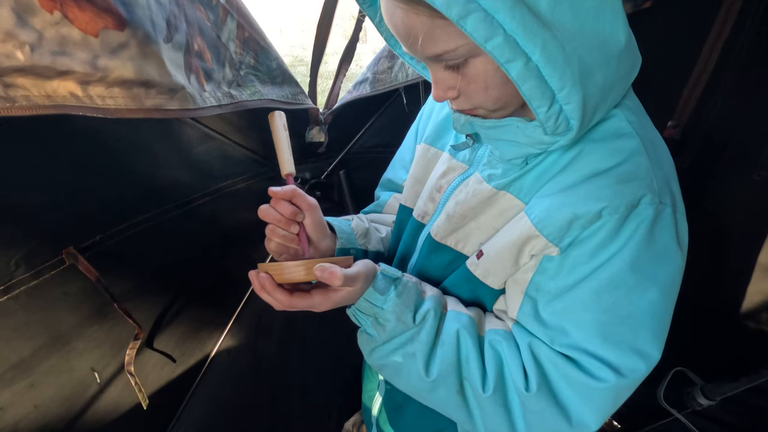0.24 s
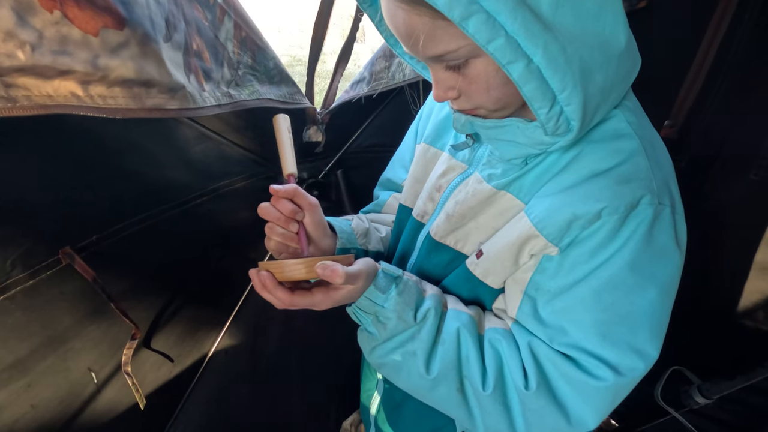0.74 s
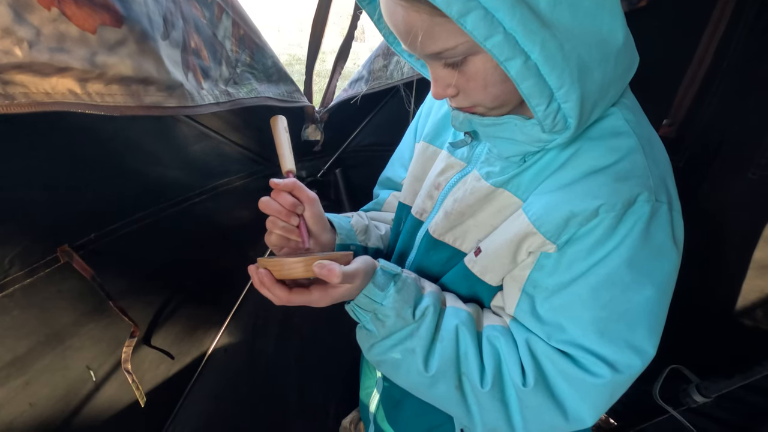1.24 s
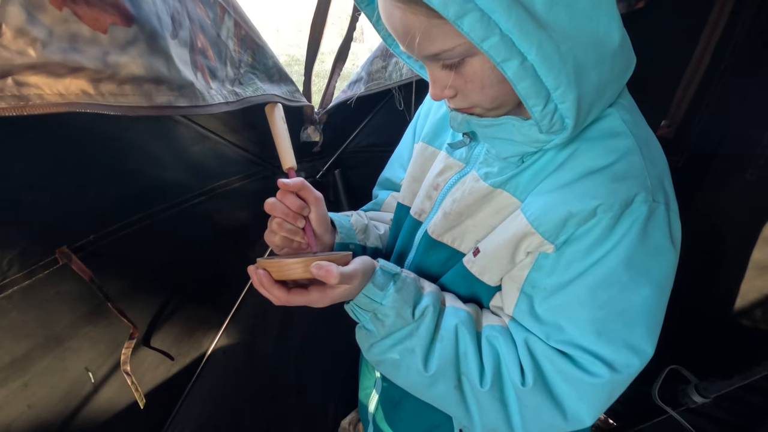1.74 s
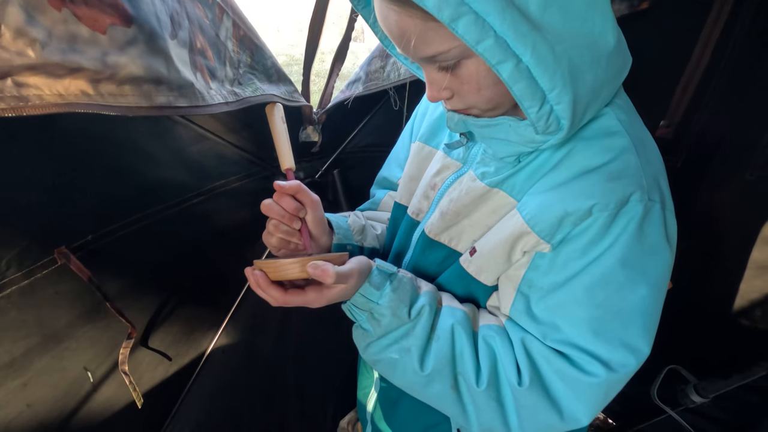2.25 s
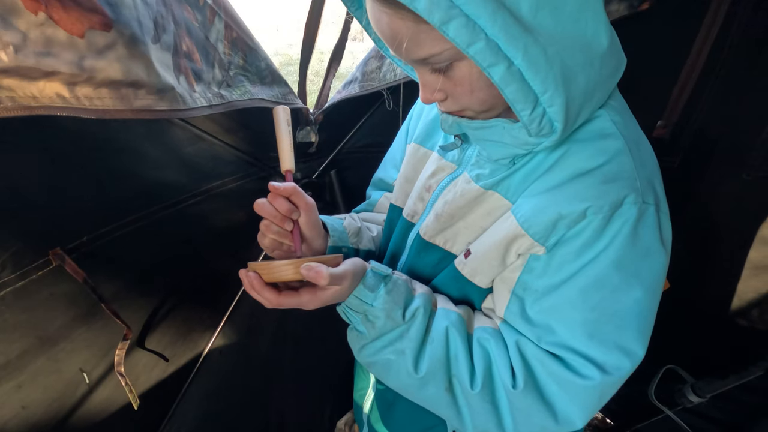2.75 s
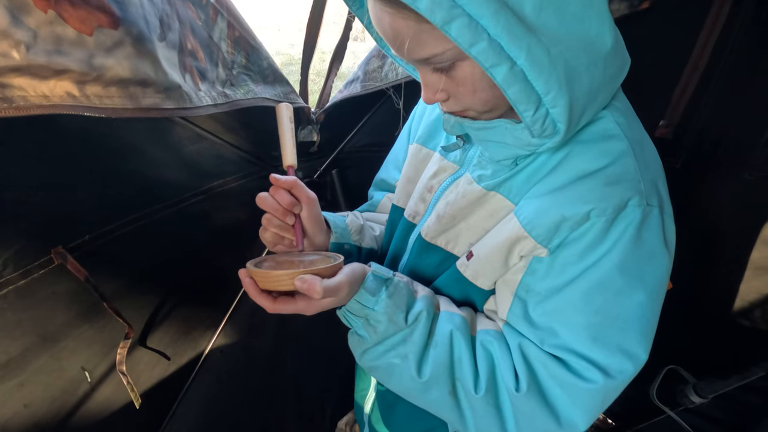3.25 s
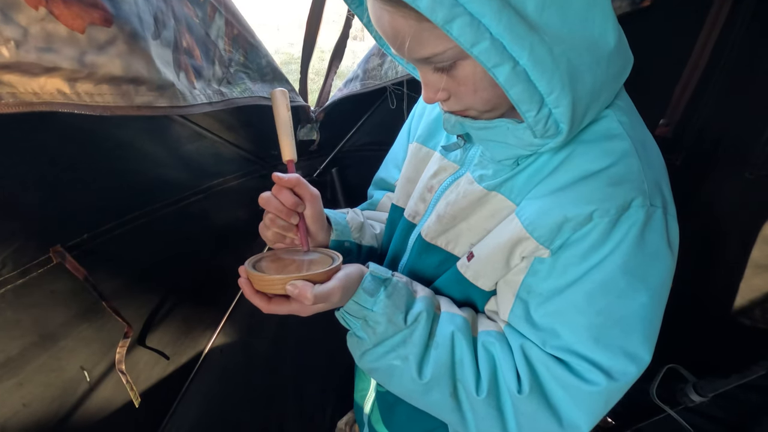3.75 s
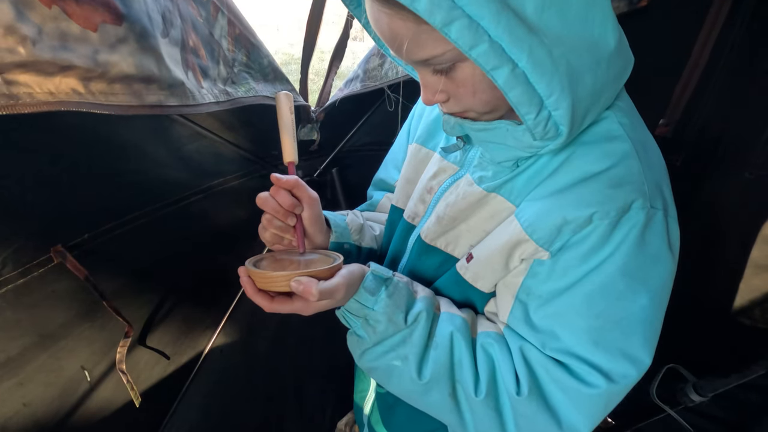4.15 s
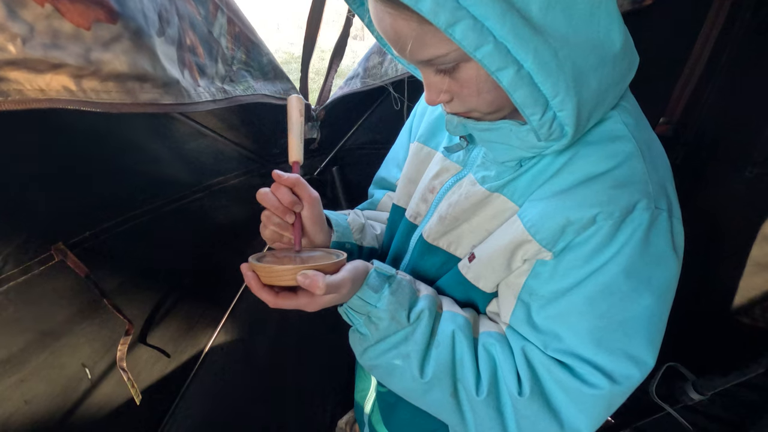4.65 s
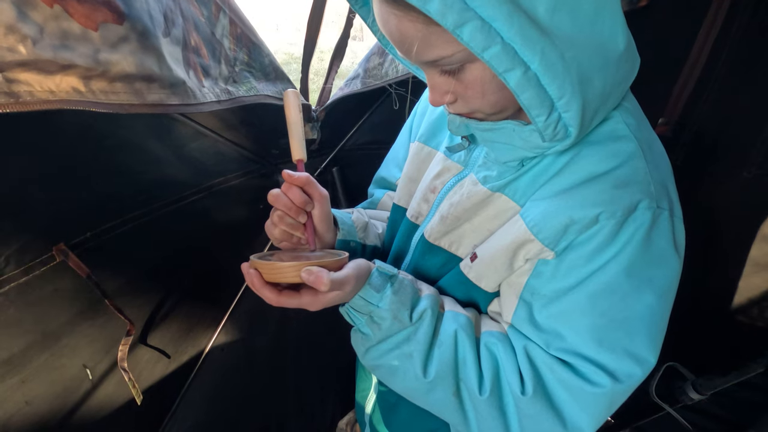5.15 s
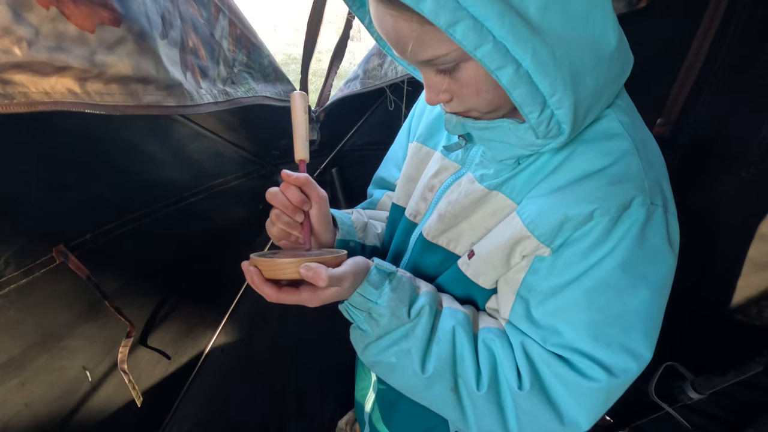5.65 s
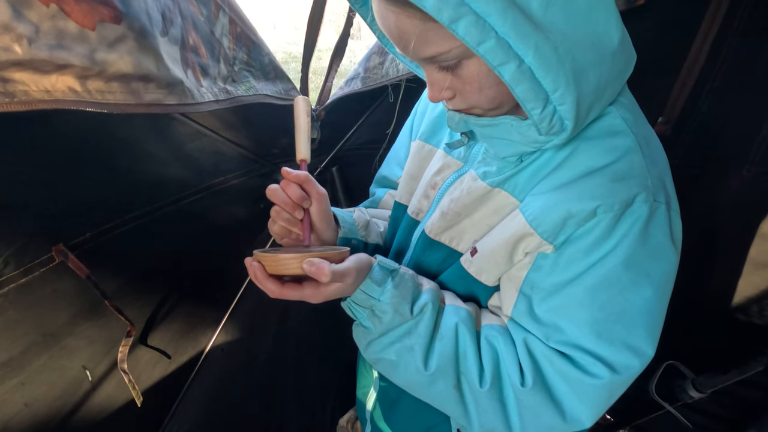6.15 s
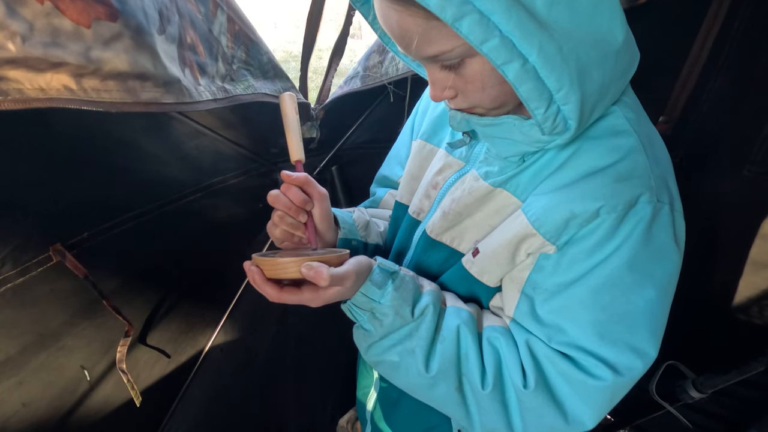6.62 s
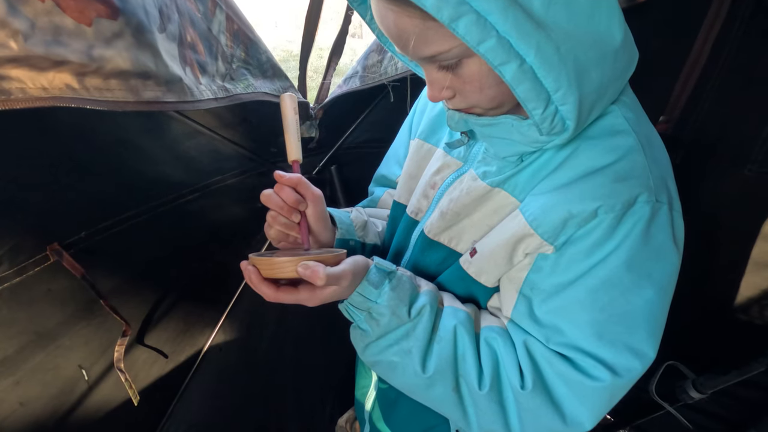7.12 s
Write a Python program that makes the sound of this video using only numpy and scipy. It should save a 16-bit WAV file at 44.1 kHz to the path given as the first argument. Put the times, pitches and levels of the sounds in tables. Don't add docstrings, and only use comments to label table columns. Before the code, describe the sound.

Close, dry, woody hen-turkey yelps, nasal whines and sharp clucks from a friction pot call inside a cloth blind, with quiet outdoor hush.

```python
import sys
import numpy as np
from scipy import signal
from scipy.fft import rfft, irfft
from scipy.io import wavfile
from scipy.ndimage import uniform_filter1d

SR = 44100
rng = np.random.default_rng(int(sys.argv[2]) if len(sys.argv) > 2 else 0)


def inscribe(sig):
    pcm = np.round(np.clip(np.atleast_2d(sig).T, -1, 1) * 32767)
    wavfile.write(sys.argv[1], SR, pcm.astype(np.int16))


def linear_from_db(decibels):
    return 10 ** (np.asarray(decibels, float) / 20)


N = 325458
FREE_HZ = 985


def read(points, hz):
    f, value = np.transpose(points)
    return np.interp(np.log(hz + 1), np.log(f + 1), value)


def amp_at(points, hz):
    return linear_from_db(read(points, hz))


def evened(x):
    return x / np.sqrt(np.mean(x ** 2) + 1e-20)


def band(x, lo_hz, hi_hz):
    return signal.lfilter(*signal.butter(2, [lo_hz, hi_hz], "band", fs=SR), x)


def wander(count, hz):
    drift = signal.lfilter(*signal.butter(3, hz, fs=SR), rng.standard_normal(16384))
    return evened(drift)[-count:]


def add(mix, s, sound):
    part = mix[round(s * SR):][:len(sound)]
    part += sound[:len(part)]


def level(rows):
    s, db = np.transpose(rows)[:2]
    return uniform_filter1d(linear_from_db(np.interp(np.arange(N) / SR, s, db, -200, -200)), size=900)


def echoes(x, t60):
    at = np.arange(150, 8000, 20) + rng.integers(0, 20, (2, 393))
    taps = np.zeros((2, 8100))
    np.put_along_axis(taps, at, rng.choice([-1., 1.], at.shape) * linear_from_db(-60 * at / SR / t60), 1)
    return signal.fftconvolve(x[None], taps / np.linalg.norm(taps[0]), axes=1)[:, :N]


def air():
    # f/Hz, level/dB per Hz
    hush = [(20, 0.5), (100, -12.5), (190, -8), (310, -23), (500, -24), (1100, -24), (1900, -27),
            (2600, -25.5), (3300, -34.5), (6000, -38.5), (8500, -41.5), (10500, -49.5), (14000, -55.5)]
    # f/Hz, likeness/0-1
    alike = [(60, 0.83), (180, 0.25), (530, 0.29), (1580, 0.12), (4700, 0.65), (14000, 0.27)]
    frames, hz = N // 512 + 5, np.fft.rfftfreq(2048, 1 / SR)
    a, b, c, d, patches = rng.standard_normal((frames, 1025, 5)).T
    patches = evened(uniform_filter1d(uniform_filter1d(patches, 14, 0), 12, 1))
    same = np.clip(read(alike, hz), -1, 1)[:, None]
    left = a + 1j * b
    right = same * left + np.sqrt(1 - same ** 2) * (c + 1j * d)
    z = np.array([left, right]) * linear_from_db(read(hush, hz)[:, None] + 1.2 * patches)
    sound = signal.istft(z, nperseg=2048, noverlap=1536)[1][:, :N]
    return linear_from_db(-68.5) * evened(sound)


def engine():
    # t/s, level/dB
    drone = [(0.0, -81.5), (0.59, -90), (1.54, -75), (1.95, -84), (2.55, -62.5), (3.82, -60.5), (4.34, -71),
             (4.81, -64), (5.57, -84), (5.73, -78), (7.38, -82.5)]
    return level(drone) * evened(band(rng.standard_normal(N), 73, 79))


def rumble():
    # t/s, level/dB
    swell = [(0.0, -72.5), (0.57, -74), (3.02, -60), (3.21, -69.5), (3.7, -64.5), (4.3, -66), (5.24, -73),
             (5.32, -70), (5.43, -66.5), (6.7, -74), (7.38, -71)]
    return linear_from_db(-6.5) * level(swell) * evened(band(rng.standard_normal(N), 17, 190))


def whistle(length, first_hz, last_hz, arch_hz, db, flutter, edge):
    u = np.linspace(0, 1, round(length * SR))
    hz = first_hz + (last_hz - first_hz) * u + arch_hz * np.sin(np.pi * u)
    rough = 1 + flutter * np.resize(wander(16384, hz=69.2), len(hz))
    tone = np.sin(2 * np.pi * np.cumsum(hz) / SR)
    return linear_from_db(db) * rough * tone * signal.windows.tukey(len(hz), edge)


def cooing():
    # start/s, end/s, f/Hz, level/dB
    coos = [
        (2.15, 2.679, 441, -71),
        (6.5, 6.903, 497, -76),
    ]
    out = np.zeros(N)
    for a, b, hz, db in coos:
        add(out, a, whistle(b - a, hz, hz, 0, db, flutter=.1, edge=0.33))
    return out


def bird():
    # t/s, length/s, first f/Hz, last f/Hz, arch/Hz, level/dB
    notes_sung = [(3.12, 0.17, 2880, 2315, 33, -65), (3.39, 0.14, 2850, 2400, 40, -69),
                  (5.265, 0.12, 3015, 2800, -94.5, -72.5), (5.35, 0.19, 2980, 2920, 0, -84),
                  (5.4, 0.33, 8430, 7550, -3, -80.5)] + [ (s - .008, .045, 2520, 2430, 190, db) for s, db in [(3.6394, -75.5),
                  (3.7549, -80), (3.8846, -81), (4.8574, -75), (4.9766, -78.5), (5.1063, -75.5),
                  (5.221, -66), (5.3444, -68), (5.469, -63), (6.32, -72), (6.4507, -75), (6.5694, -77.5),
                  (6.6892, -76.5), (6.7794, -76.5)]]
    out = np.zeros(N)
    for row in notes_sung:
        add(out, row[0], whistle(*row[1:], flutter=.7, edge=.6))
    return out + linear_from_db(-8) * echoes(out, t60=.25)


def outdoors():
    return cooing() + engine() + rumble() + bird()


def cloth():
    # t/s, level/dB
    rustle = [
        (3.22, -82),
        (3.3, -68.5),
        (3.513, -78.5),
        (3.56, -89),
    ]
    grains = rng.standard_normal(N) * linear_from_db(1.8 * rng.standard_normal(N // 60 + 1).repeat(60)[:N])
    return evened(band(grains, 1300, 6500)) * level(rustle)


def taps_of_hands():
    # t/s, level/dB, f/Hz
    ticks = [
        (1.549, -64.5, 150.3),
        (3.297, -54.5, 2565),
        (5.12, -46.5, 231),
        (5.179, -47, 203),
        (5.221, -55, 156),
    ]
    out = np.zeros(N)
    t = np.arange(1500) / SR
    for s, db, hz in ticks:
        click = (hz / 2500) * rng.standard_normal(1500) * np.exp(-t / 0.00033)
        thud = np.sin(2 * np.pi * hz * t) + click
        add(out, s, linear_from_db(db) * thud * np.exp(-t / 0.0056) * np.minimum(1, t * hz * 2))
    return out


def pot_gain(hz):
    # f/Hz, width/Hz, level/dB
    modes = [(1001, 100.7, -8), (1561, 56, 0), (1820.3, 167, 2), (2352, 110, -17), (2592, 170, -13.5),
             (2757, 41, -15), (3865, 180, -25.5), (4409, 180, -19), (4710, 300, -29), (5300, 130, -36.5),
             (7650, 270, -38.5), (11600, 700, -54.5)]
    # f/Hz, level/dB
    radiate = [(200, -33.5), (450, -12.5), (700, -9.5), (1000, 4), (3300, -4), (6000, -2), (8300, -2.5),
               (9200, -10.5), (10200, -2), (11100, -9.5), (12200, -2.5), (13500, -16.5)]
    power = sum(linear_from_db(2 * db) / (1 + (2 * (hz - f) / width) ** 2) ** 1.382 for f, width, db in modes)
    return np.sqrt(power) * amp_at(radiate, hz)


def pot_ring():
    log_gain = np.log(pot_gain(abs(np.fft.fftfreq(16384, 1 / SR))) + 1e-5)
    return np.fft.ifft(np.exp(signal.hilbert(log_gain).conj())).real[:4096]


def drag(ring):
    # start/s, end/s, first level/dB, last level/dB
    drags = [
        (0, .04, -67, -61),
        (.235, .388, -61, -66),
        (.565, .69, -58, -64),
        (.905, 1.05, -67, -58),
        (1.245, 1.4, -75, -90),
        (2.78, 2.865, -66, -72),
        (2.97, 3.015, -64, -68),
        (6.865, 6.965, -77, -72),
    ]
    grains = rng.standard_normal(N) * linear_from_db(1.2 * rng.standard_normal(N // 100 + 1).repeat(100)[:N])
    scratch = np.diff(grains, 2, prepend=[0, 0]) + .035 * grains
    scratch = evened(signal.oaconvolve(scratch, ring)[:N]) + .12 * evened(band(grains, 1200, 5000))
    return evened(scratch) * sum(level([(a, first), (b, last)]) for a, b, first, last in drags)


def swing(t, db, rise, from_db, sag_db, release, to_db):
    u = t - t[0]
    rising = from_db * np.maximum(1 - u / rise, 0) ** 2
    return db + rising + sag_db * u / u[-1] + to_db * np.maximum(1 - u[::-1] / release, 0)


def yelp(start, length, db, dive, steady):
    catch_hz, dive_hz, steady_hz, rasp_hz = 905, 610, 465, 365
    t = np.arange(start, start + length, 1 / SR)
    u = t - start
    diving = dive_hz * (catch_hz / dive_hz) ** (np.maximum(1 - u / dive, 0) ** 1.3)
    hz = np.where(u < dive, diving, steady_hz)
    shifted = np.clip((u - steady) / .008, 0, 1)
    uneven = .012 + shifted * (.13 + .08 * (u / length) ** 4)
    loud_db = swing(t, db, rise=dive, from_db=-20, sag_db=-4, release=.008, to_db=-7)
    return t, loud_db, hz + shifted * (rasp_hz - hz), uneven


def cluck(start, length, db, drop_hz, deepest):
    stall_hz, knee_hz, stall_db = 702, 18, -6.5
    t = np.arange(start, start + length, 1 / SR)
    deepest_s = np.clip(deepest, .1, .9) * length
    push = np.interp(t - start, [0, deepest_s, length], [.2, 1, .03]) ** .85
    hz = stall_hz + knee_hz * np.logaddexp(0, (FREE_HZ - drop_hz * push - stall_hz) / knee_hz)
    stalled = np.exp(-(hz - stall_hz) / 45)
    loud_db = swing(t, db, rise=.004, from_db=-3, sag_db=0, release=.005, to_db=-5)
    return t, loud_db + stall_db * stalled, hz


def whine(start, length, db, first_hz, last_hz, shape):
    t = np.arange(start, start + length, 1 / SR)
    return t, swing(t, db, *shape), np.linspace(first_hz, last_hz, len(t))


def drawn(rows):
    s, db, hz = np.transpose(rows)
    t = np.arange(s[0], s[-1], 1 / SR)
    return t, np.interp(t, s, db), uniform_filter1d(np.interp(t, s, hz), size=200, mode="nearest")


def slips(t, loud_db, hz, uneven):
    # start/s, end/s, share/0-1
    limps = [
        (2.692, 2.726, 0.25),
        (2.876, 2.909, 0.22),
        (4.636, 4.676, 0.1),
        (5.84, 5.881, 0.05),
        (5.95, 6.15, .012),
    ]
    plate_hz, lock = 1800, .3
    limp = sum(np.clip(share, 0, .9) * ((t > a) & (t < b)) for a, b, share in limps)
    flutter = np.clip(.013 + .0012 * (-25 - loud_db), .013, .028) * (hz / FREE_HZ) ** 2
    turns = np.cumsum(hz * (1 + (flutter + .5 * uneven) * wander(len(t), hz=70))) / SR
    count = np.arange(1, int(turns[-1]) + 1)
    at = np.interp(count, turns, np.arange(len(t)))
    k = at.astype(int)
    late, size = rng.standard_normal((400, 2))[:len(count)].T
    odd = limp[k] * (count % 2)
    at = at + SR / hz[k] * (.6 * uneven[k] * late + 0.2 * odd)
    in_step = np.round(at * plate_hz / SR) * SR / plate_hz
    at += lock * np.clip(10 * uneven[k] - .2, 0, 1) * (in_step - at)
    size = np.exp(0.77 * uneven[k] * size) * (1 - odd)
    force = np.zeros(len(t) + 200)
    taps = np.clip(at.astype(int)[:, None] + np.arange(-8, 9), -8, len(t) + 90)
    away = taps - at[:, None]
    np.add.at(force, taps + 8, size[:, None] * np.sinc(away) * np.cos(away * np.pi / 18) ** 2)
    return force[8:len(t) + 8]


def push_on_plate(force, hz, start):
    # from t/s, level of 2 kHz modes/dB, level of 3-6 kHz modes/dB, level above 7 kHz/dB
    grips = [(0, 2.5, 3, -2), (2, -5, -3, 8), (2.65, 0, 6, 4), (2.8, 0, 0, -3), (2.95, 0, -9, -15),
             (3.9, 1, -12, 0), (4.4, 0, -3, -1), (5.4, 1, -5, 0), (5.74, 0, -9, -6), (5.84, 0, 1, -4),
             (6.6, -3, -15, 6)]
    crisp_db = 6
    plate_db, middle_db, top_db = [row[1:] for row in grips if row[0] <= start][-1]
    count = len(force)
    grit = np.sqrt(hz / SR) * rng.standard_normal(16384)[:count]
    gritty = .94 * force + .31 * grit
    middle = linear_from_db(middle_db + crisp_db * np.log2(FREE_HZ / hz)) * band(gritty, 3000, 6400)
    middle *= linear_from_db(1.6 * wander(count, hz=45))
    top = linear_from_db(top_db + 3.4 * wander(count, hz=45)) * band(gritty, 5600, 14000)
    low = signal.lfilter(*signal.butter(2, 3000, fs=SR), force + linear_from_db(-44) * grit)
    low += (linear_from_db(plate_db) - 1) * band(force, 1400, 2600)
    return low - middle + top


def stroke(ring, t, loud_db, hz, uneven=.002):
    lead = round(.008 * SR)
    loud_db = np.append(loud_db[0] + np.linspace(-36, -20, lead), loud_db)
    loud_db = uniform_filter1d(uniform_filter1d(loud_db, size=110), size=110)
    hz, uneven = (np.pad(c + 0 * t, (lead, 0), "edge") for c in (hz, uneven))
    t = t[0] + np.arange(-lead, len(t)) / SR
    start, end = t[0], t[-1]
    push = push_on_plate(slips(t, loud_db, hz, uneven), hz, start)
    reached = signal.oaconvolve(push, ring)[:len(t)] ** 2
    grip = 400 if uneven.max() > .1 else 200
    reached = uniform_filter1d(uniform_filter1d(reached, size=grip), size=grip)
    reached[:130] = reached[130]
    lift = np.minimum(1, (end - t) / 0.0015)
    sound = signal.oaconvolve(push * lift, ring)
    throb_db = np.clip(.25 * (-25 - loud_db), 1, 3) + 20 * uneven
    throb = uniform_filter1d(np.minimum(wander(len(t), hz=85), .6), size=120)
    pressure = linear_from_db(loud_db + throb_db * throb) / np.sqrt(reached)
    pressure *= np.minimum(1, (t - start) / 0.005)
    return start, -sound * np.pad(pressure, (0, len(ring) - 1), "edge")


def striker():
    # start/s, length/s, level/dB, dive/s, steady until/s after the start
    yelps = [
        (.046, .141, -16, .04, .088),
        (.394, .112, -18.5, .027, .036),
        (.698, .134, -17.5, .03, .04),
        (1.058, .138, -16.5, .018, .03),
    ]
    # start/s, length/s, level/dB, drop of slip rate/Hz, deepest at share/0-1
    clucks = [
        (2.68, .054, -17.5, 215, .4),
        (2.871, .057, -16, 400, .35),
        (3.022, .052, -16.5, 700, .45),
        (4.42, .071, -17.5, 160, .56),
        (4.538, .053, -16.5, 240, .65),
        (4.643, .048, -16, 1000, .42),
        (5.759, .055, -18, 320, .45),
    ]
    # start/s, length/s, level/dB, first f/Hz, last f/Hz
    whines = [(2.256, .054, -42, 915, 940), (2.537, .058, -20.5, 975, 965), (3.995, .031, -27, 950, 1090),
              (4.052, .044, -20.5, 1030, 990), (4.143, .023, -18, 900, 945), (4.176, .033, -17, 940, 950),
              (4.237, .051, -17, 942, 995), (4.317, .056, -18.5, 968, 1000),
              (5.572, .059, -29.5, 1005, 915), (5.662, .075, -20.5, 915, 930), (7.242, .021, -29, 950, 985),
              (7.35, .032, -25, 1020, 960)]
    # start/s, length/s, level/dB, first f/Hz, last f/Hz
    swells = [
        (2.2, .047, -39, 1015, 975),
        (2.368, .054, -26, 920, 950),
        (2.425, .087, -25.5, 930, 1000),
        (5.478, .083, -36, 985, 1040),
        (6.79, .062, -52, 1005, 935),
    ]
    # start/s, length/s, level/dB, f/Hz
    touches = [
        (.506, .03, -32, 870),
        (.832, .04, -23, 845),
        (1.196, .014, -31, 850),
        (2.339, .015, -35, 950),
        (3.225, .05, -61, 990),
        (3.674, .013, -53, 905),
        (3.752, .026, -61, 890),
        (4.764, .014, -37.5, 810),
        (6.23, .015, -58, 880),
        (6.972, .016, -53, 930),
    ]
    # t/s, level/dB, slip rate/Hz
    low_note = [
        (5.843, -19, 860),
        (5.853, -20, 705),
        (5.897, -25, 698),
        (5.913, -18.5, 775),
        (5.932, -24, 708),
        (6.056, -25.5, 703),
        (6.074, -20, 760),
        (6.17, -29, 700),
        (6.181, -23, 840),
    ]
    # t/s, level/dB, slip rate/Hz
    long_whine = [
        (7.005, -41, 880),
        (7.05, -33, 905),
        (7.08, -34, 948),
        (7.13, -28.5, 960),
        (7.16, -29.5, 980),
        (7.22, -30, 980),
        (7.237, -42, 955),
    ]
    # t/s, level/dB, slip rate/Hz
    late_whine = [
        (7.273, -42, 955),
        (7.29, -27, 968),
        (7.316, -27, 980),
        (7.327, -38, 970),
    ]
    # rise/s, from level/dB, sag/dB, release/s, to level/dB
    whine_shape = (.006, -5, -1.5, .01, -10)
    # rise/s, from level/dB, sag/dB, release/s, to level/dB
    touch_shape = (.005, -6, -8, .006, -6)
    strokes = [yelp(*row) for row in yelps] + [cluck(*row) for row in clucks]
    strokes += [whine(*row, whine_shape) for row in whines]
    strokes += [drawn(low_note), drawn(long_whine), drawn(late_whine)]
    for row in swells:
        swell_shape = (.75 * row[1], -17, *whine_shape[2:])
        strokes.append(whine(*row, swell_shape))
    strokes += [whine(*row, row[-1], touch_shape) for row in touches]
    out, ring = np.zeros(N), pot_ring()
    for controls in strokes:
        add(out, *stroke(ring, *controls))
    return out + drag(ring)


def ports(x):
    # f/Hz, level/dB
    sides_db = [(500, .6), (1000, .8), (2000, 1.8), (8000, 2), (12000, 3.5)]
    # f/Hz, phase/rad
    sides_phase = [(300, -.1), (1000, -.3), (2000, -.55), (4000, -.55), (8000, -.5), (12000, -1.)]
    hz = np.fft.rfftfreq(N, 1 / SR)
    half = linear_from_db(read(sides_db, hz) / 2) * np.exp(.5j * read(sides_phase, hz))
    return irfft(rfft(x) * np.array([half, 1 / half]), N)


def scene():
    near = striker() + cloth() + taps_of_hands()
    walls = echoes(linear_from_db(-15) * near + linear_from_db(-14) * band(near, 2200, 9000), t60=.12)
    return ports(near) + walls + outdoors() + air()


def roll_off(x):
    return signal.sosfilt(signal.butter(12, 14570, fs=SR, output="sos"), x)


def record(dry):
    edge = signal.firwin(255, 14200, fs=SR)
    mix = signal.oaconvolve(dry, edge[None], "same")
    return roll_off(mix)


dry = scene()
out = record(dry)
inscribe(out)
```